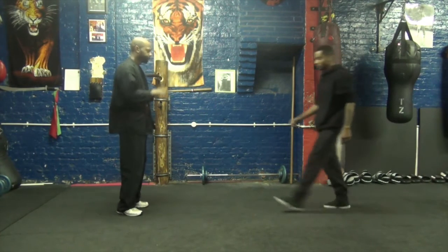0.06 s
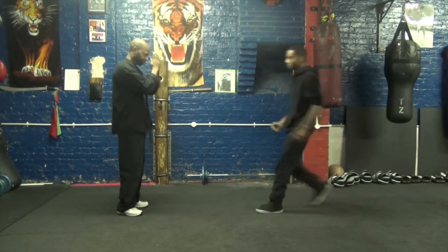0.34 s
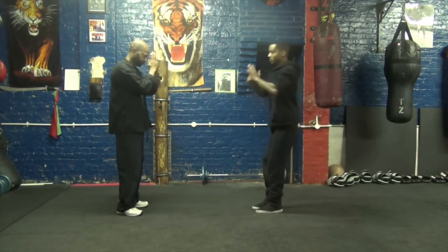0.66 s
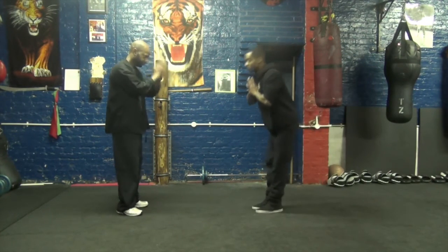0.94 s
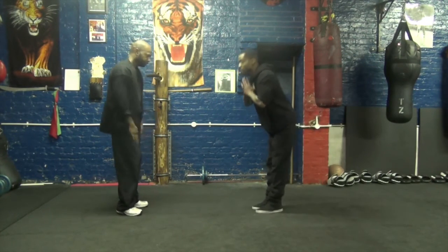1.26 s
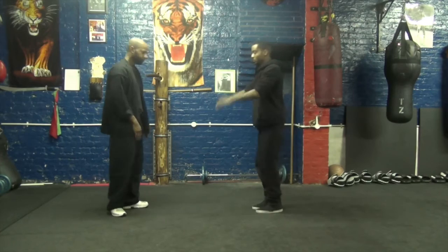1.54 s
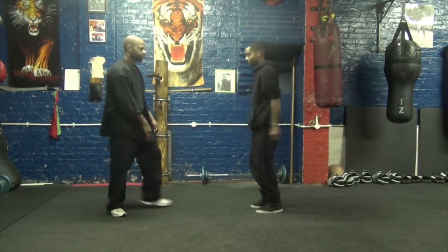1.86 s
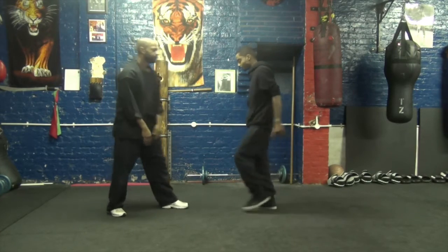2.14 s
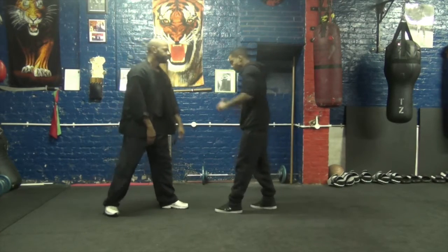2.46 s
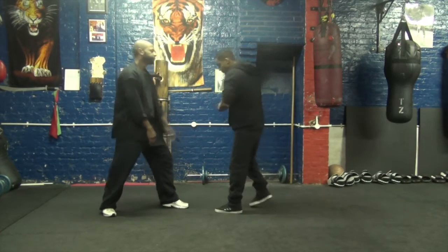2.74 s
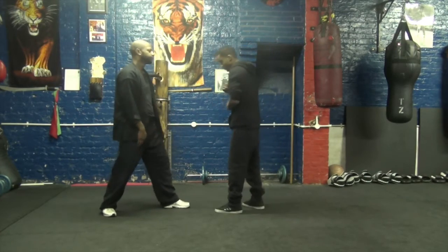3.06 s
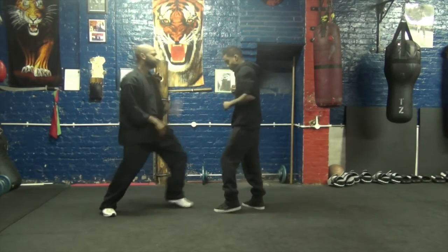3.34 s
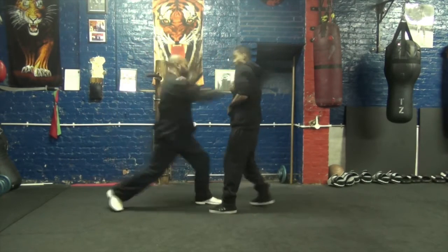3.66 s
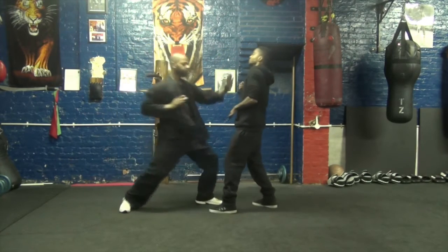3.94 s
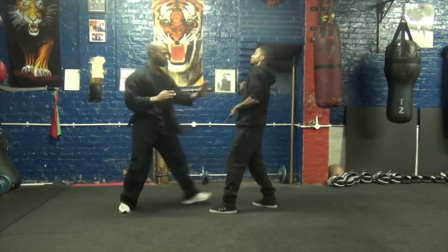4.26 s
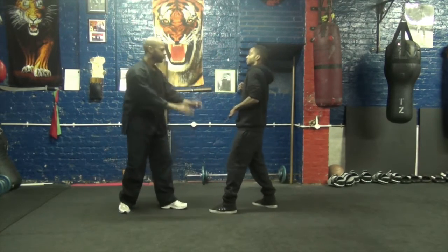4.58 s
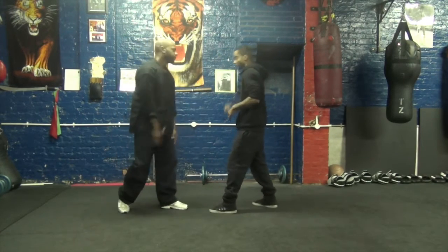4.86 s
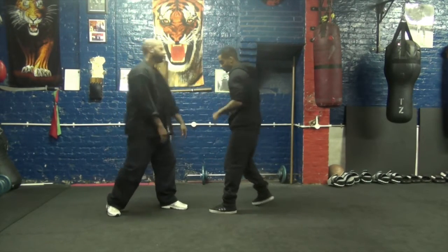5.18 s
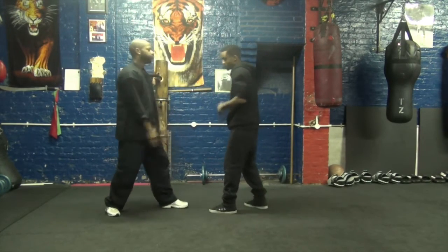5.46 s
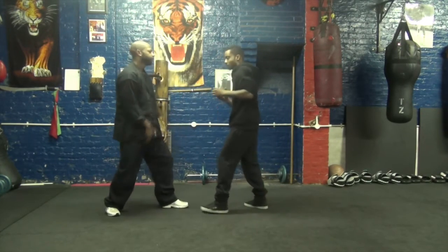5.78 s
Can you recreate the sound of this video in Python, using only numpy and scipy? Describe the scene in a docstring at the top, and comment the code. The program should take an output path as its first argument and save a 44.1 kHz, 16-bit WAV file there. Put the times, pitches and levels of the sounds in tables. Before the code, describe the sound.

A faint engine and traffic hum outside a hard-walled gym while soft steps and rustling sleeves move over a rubber mat. A hand smacks once, the engine fades, and the shuffling continues. Then a quick rush of footfalls, cloth and a dragged shoe brings one hard slap and thump against a body. A few light pats and more steps end it. The sound is almost mono, with a short echo after each blow.

```python
"""Cloth swishes and a shoe scuffs a rubber mat: two people drill hand strikes in a brick-walled gym.
Feet land heel then ball in cushioned thuds, dragged soles rasp, and sleeves rustle with each swing.
Hands slap cloth and body with a crack, a clap of trapped air and a thump, hardest just before 4 s.
The hard room rings after each blow; an engine and traffic hum faintly beyond the walls."""
import sys
import numpy as np
from scipy import signal
from scipy.fft import rfft, irfft
from scipy.io import wavfile
from scipy.ndimage import uniform_filter1d

SR = 44100
rng = np.random.default_rng(int(sys.argv[2]) if len(sys.argv) > 2 else 0)


def materialize(psi):
    """Save the field psi as 16-bit PCM at rate SR to the path in sys.argv[1].

    A 1-D psi becomes a single channel; in a 2-D psi each row is a channel.
    """
    bounded = np.clip(np.atleast_2d(psi).T, -1, 1)
    quanta = np.round(bounded * 32767).astype(np.int16)
    wavfile.write(sys.argv[1], SR, quanta)


N = 265482
TIME = np.arange(N) / SR


def undb(db):
    """Decibels to gain."""
    return 10 ** (np.asarray(db) / 20)


def unit(x):
    """Scale to an energy of one."""
    return x / np.sqrt(np.sum(x ** 2) + 1e-18)


def band(x, hz, kind, order=2):
    """Butterworth filter."""
    return signal.sosfilt(signal.butter(order, np.clip(hz, 10, .45 * SR), kind, fs=SR, output="sos"), x)


def lookup(table, hz):
    """Read (freq_hz, value) points on a log-frequency axis."""
    freq_hz, value = np.transpose(table)
    return np.interp(np.log(hz + 1e-3), np.log(freq_hz), value)


def equalise(x, curve, size=8192):
    """Minimum-phase EQ through (freq_hz, gain_db) points."""
    cepstrum = irfft(np.log(undb(lookup(curve, np.fft.rfftfreq(size, 1 / SR)))))
    cepstrum[1:size // 2] *= 2
    cepstrum[size // 2 + 1:] = 0
    return signal.fftconvolve(x, irfft(np.exp(rfft(cepstrum))))[:len(x)]


def add(track, start_s, x):
    """Mix x into the track from start_s."""
    i = max(int(start_s * SR), 0)
    track[i:i + len(x)] += x[:max(len(track) - i, 0)]


def wander(rate_hz):
    """Random drift that glides to a new value rate_hz times a second."""
    knots = rng.standard_normal(4096)
    return np.interp(TIME * rate_hz, np.arange(len(knots)), knots)


def contact(decay_s, rise, size=8192):
    """Soft surfaces meet in many tiny collisions that swell and die; rise is a share of decay_s."""
    age = np.arange(size) / SR / decay_s
    envelope = np.exp(-age) * (1 - np.exp(-age / rise)) + 1e-9
    burst = envelope * rng.standard_normal(size)
    for _ in range(4):
        # soft surfaces favour no pitch: level the spectrum, then restore the envelope
        flat = irfft(np.exp(1j * np.angle(rfft(burst))))
        local_rms = np.sqrt(np.abs(uniform_filter1d(flat ** 2, size=96)) + 1e-18)
        burst = flat * envelope / local_rms
    return burst


def burst(decay_s, rise, hz, kind="band", order=2):
    """One contact, filtered and scaled to an energy of one."""
    return unit(band(contact(decay_s, rise), hz, kind, order))


def hum(curve, harmonics_db, waver, flutter_db):
    """A distant motor: only its lowest harmonics pass the walls, wavering in pitch and level."""
    time_s, *columns = np.transpose(curve)
    pitch_hz, level_db = (np.interp(TIME, time_s, column) for column in columns)
    phase = 2 * np.pi * np.cumsum(pitch_hz * (1 + waver * wander(5.9))) / SR
    return sum(undb(level_db + gain_db + flutter_db * wander(19)) * np.sin(k * phase)
               for k, gain_db in enumerate(harmonics_db, 1))


# Spectrum of the noise bed: freq_hz, relative_db
ROOM_TONE_EQ = [(25, -7.5), (55, -33), (85, -7.5), (170, 1), (300, -2.5), (500, -8.5), (1000, -15),
                (1700, -18), (3000, -25), (4700, -29), (5900, -23.5), (9000, -27.5), (14500, -28.5),
                (16000, -43)]


def room_tone(level_db=-51, swell_db=1.0, side_db=-26):
    """A near-mono bed of room rumble and thin hiss, swelling slightly."""
    mid, side = (np.sqrt(N) * unit(equalise(rng.standard_normal(N), ROOM_TONE_EQ)) for _ in range(2))
    return undb(level_db + swell_db * wander(3.09)) * (mid + undb(side_db) * np.array([side, -side]))


# Path of the traffic drone: time_s, pitch_hz, level_db
TRAFFIC_CURVE = [(0, 56.4, -56.5), (1.6, 54.9, -53), (3.2, 56, -63), (6, 56.2, -66)]


def traffic():
    """Traffic comes through the walls as one low, unsteady tone."""
    return hum(TRAFFIC_CURVE, [0], waver=0.043, flutter_db=-1.5)


# Path of the engine outside: time_s, firing_rate_hz, level_db
ENGINE_CURVE = [(0, 70.8, -52), (.5, 72.35, -57.5), (.7, 75.35, -47.5), (1.13, 76.8, -45), (1.4, 74, -70)]
# Harmonics 1 to 5 of the firing rate: gain_db
ENGINE_HARMONICS = [-12, -2, -9, -10, -30]


def engine():
    """An engine outside hums at its firing rate, revs a little and falls away."""
    return hum(ENGINE_CURVE, ENGINE_HARMONICS, waver=0.0056, flutter_db=1.0)


# Ring of the brick room: freq_hz, t60_s
GYM_DECAY = [(100, 0.34), (250, 0.8), (600, 0.62), (1500, 0.84), (4000, 0.74), (8000, 0.59), (15000, 0.69)]


def gym_tail(build_s=0.0046, size=49152, bands=12):
    """Dense echoes build up, then fade at each band's own rate."""
    t, hz = np.arange(size) / SR, np.fft.rfftfreq(size, 1 / SR)
    spectrum, tail = rfft(rng.standard_normal(size)), np.zeros(size)
    centres_hz = np.geomspace(100, 15000, bands)
    for centre_hz, weights in zip(centres_hz, np.eye(bands)):
        echoes = irfft(spectrum * lookup(np.c_[centres_hz, weights], hz))
        tail += echoes * np.exp(-np.log(1000) * t / lookup(GYM_DECAY, centre_hz))
    return tail * (1 - np.exp(-t / build_s))


# Tone colour of everything played on the mat: freq_hz, gain_db
GYM_EQ = [(30, -17), (58, -15), (80, -21), (115, -8), (160, -1), (300, -2), (600, -2), (1050, -2),
          (1750, -1), (2200, -4), (3600, -3.5), (4900, -7), (5900, 2), (8000, -5), (11000, -8),
          (16000, -15)]


def gym(x, direct_db, early_db, left_db, early_s=0.012, warmth_db=1.5, warmth_hz=2500, side_db=-47):
    """Direct sound, scattered first echoes and tail, in a narrow stereo image."""
    response = gym_tail()
    response *= 1 + undb(early_db) * np.exp(-np.arange(len(response)) / SR / early_s)
    click = signal.unit_impulse(256)
    direct = click + (undb(warmth_db) - 1) * band(click, warmth_hz, "low", order=1)  # low shelf
    add(response, 0, undb(direct_db) * direct)
    coloured = equalise(x, GYM_EQ)
    mid = signal.fftconvolve(coloured, response)[:N]
    side = signal.fftconvolve(coloured, undb(side_db) * gym_tail())[:N]
    return np.array([mid * undb(left_db / 2) + side, mid * undb(-left_db / 2) - side])


# Swings of sleeves and trouser legs: peak_s, rustle_db, hiss_db, length_s
CLOTH_SWINGS = [ (0.01, -52.5, -54.5, .08), (0.314, -44, -46.5, 0.21), (1.323, -37, -50, 0.016),
                (1.533, -59, -39.5, .02), (1.697, -52.5, -51, 0.039), (1.832, -56, -42.5, 0.068),
                (2.047, -51.5, -53, 0.12), (2.881, -53, -46, .12), (3.436, -65, -42.5, 0.062),
                (3.523, -52.5, -44.5, 0.11), (3.675, -37.5, -28, .066), (3.73, -42, -23.5, 0.067),
                (4.3, -57, -44.5, 0.15), (4.864, -57, -59, .05), (4.934, -47.5, -55, 0.022),
                (5.436, -56, -48.5, 0.027), (6, -52.5, -48.5, 0.12)]


def cloth_swishes(rustle_hz=(500, 2200), hiss_hz=4200, catch_db=3.0, catch_rate_hz=260):
    """Cloth slides in tiny catches, swelling and fading with the speed of the limb."""
    rustle = band(rng.standard_normal(N), rustle_hz, "band", order=1)
    hiss = band(rng.standard_normal(N), hiss_hz, "high", order=1)
    catches = undb(catch_db * wander(catch_rate_hz))
    out = np.zeros(N)
    for peak_s, rustle_db, hiss_db, length_s in CLOTH_SWINGS:
        from_peak = np.abs(TIME - peak_s) / (length_s / 2)
        speed = catches * np.exp(-np.minimum(from_peak, 20))
        out += undb(rustle_db) * unit(speed * rustle) + undb(hiss_db) * unit(speed * hiss)
    return out


# Rubber soles dragged over the mat: start_s, level_db, pitch_hz, width_hz, decay_s
SOLE_DRAGS = [(0.271, -38, 525, 410, 0.037), (2.589, -56, 880, 293, 0.011), (3.018, -51, 810, 298, 0.007),
              (3.704, -28.5, 950, 260, 0.022), (4.985, -39.5, 492, 153, 0.028),
              (5.177, -53.5, 850, 400, 0.017)]


def sole_drags(rise=0.14):
    """A sliding sole sticks and slips unevenly, giving a short, half-pitched rasp."""
    out = np.zeros(N)
    for start_s, level_db, pitch_hz, width_hz, decay_s in SOLE_DRAGS:
        edges_hz = pitch_hz * np.exp(np.array([-.5, .5]) * width_hz / pitch_hz)
        add(out, start_s, undb(level_db) * burst(decay_s, rise, edges_hz))
    return out


# Feet rolling from heel to ball: start_s, heel_db, ball_db, roll_s, thud_cutoff_hz, scuff_db
FOOTFALLS = [ (0.247, -42, -44, 0.023, 730, -63), (0.689, -47.5, -46.5, .018, 486, -53),
             (1.897, -46.5, -52, .018, 630, -41.5), (2.092, -43, -51, .058, 640, -46),
             (2.190, -48.5, -51.5, 0.047, 566, -55), (2.415, -45.5, -47.5, 0.046, 506, -38.5),
             (2.590, -42, -63, .03, 800, -55.5), (2.903, -37, -42, 0.057, 390, -52),
             (3.016, -46.5, -54, 0.044, 620, -53.5), (3.558, -42.5, -47, 0.0086, 640, -66),
             (3.582, -32, -23.5, 0.032, 700, -38), (3.686, -30, -41, .02, 580, -29),
             (3.821, -27.5, -35, .012, 258, -33), (4.492, -55.5, -48.5, .06, 493, -68),
             (4.639, -47, -59, 0.055, 450, -51), (5.186, -45.5, -49, .02, 600, -59),
             (5.447, -35, -30.5, 0.035, 820, -51), (5.636, -34.5, -40.5, 0.011, 550, -65),
             (5.902, -40.5, -44, .010, 630, -54)]


def footsteps(tap_hz=(720, 1150), floor_hz=(145, 235), grit_hz=1700, scuff_hz=5200,
              heel_decay_s=0.0102, heel_rise=0.03, ball_decay_s=0.0148, ball_rise=0.078):
    """The mat cushions heel and ball to a thud with a hollow tap; the floor booms, the sole scuffs."""
    out = np.zeros(N)
    for start_s, heel_db, ball_db, roll_s, thud_cutoff_hz, scuff_db in FOOTFALLS:
        heel = (start_s, heel_db, scuff_db, heel_decay_s, heel_rise)
        ball = (start_s + roll_s, ball_db, scuff_db - 7, ball_decay_s, ball_rise)  # scuffs less
        for land_s, weight_db, sole_db, decay_s, rise in (heel, ball):
            cushioned = band(contact(decay_s, rise), thud_cutoff_hz, "low", order=5)
            thud = unit(band(cushioned, hz=75, kind="high", order=1))
            tap = undb(-13) * burst(decay_s, rise, tap_hz)
            boom = undb(-7) * burst(decay_s, rise, floor_hz)
            grit = undb(-22) * burst(decay_s, rise, grit_hz, "low")
            scuff = burst(decay_s, rise, scuff_hz, "high", order=1)
            add(out, land_s, undb(weight_db) * (thud + tap + boom + grit) + undb(sole_db) * scuff)
    return out


# Hands on cloth and body: start_s, crack_db, smack_db, clap_db, clap_pitch_hz, thump_db, contact_s
HAND_STRIKES = [ (1.326, -28, -22.5, -27.5, 1980, -17.5, 0.0032),
                (2.886, -55, -50.5, -47, 2090, -38, 0.0073), (3.753, -15.5, -24, -16, 1500, -16.5, .006),
                (4.933, -46, -43, -46.5, 1920, -36.5, 0.0044), (4.975, -44, -43, -39, 1980, -37, 0.0061),
                (5.565, -42.5, -51, -40, 1950, -33, 0.016)]


def hand_slaps(crack_hz=(2400, 9000), smack_hz=(170, 1300), thump_cutoff_hz=580, rise=0.19,
               clap_decay_s=0.00659, clap_spread=1.556, clap_lag_s=0.0078, thump_lag_s=0.015):
    """Skin cracks and smacks, the closing palm claps out trapped air, then the body gives and thumps."""
    out = np.zeros(N)
    for start_s, crack_db, smack_db, clap_db, clap_pitch_hz, thump_db, contact_s in HAND_STRIKES:
        crack = burst(contact_s, rise, crack_hz, order=1)
        smack = burst(2 * contact_s, rise, smack_hz, order=3)
        clap_edges_hz = (clap_pitch_hz / clap_spread, clap_pitch_hz * clap_spread)
        clap = burst(clap_decay_s, rise, clap_edges_hz, order=3)
        push = contact(0.013 + 2.06 * contact_s, rise)  # a longer contact pushes the body for longer
        muffled = band(push, thump_cutoff_hz, "low", order=4)
        thump = unit(band(muffled, hz=130, kind="high", order=1))
        add(out, start_s, undb(crack_db) * crack + undb(smack_db) * smack)
        add(out, start_s + clap_lag_s, undb(clap_db) * clap)
        add(out, start_s + thump_lag_s, undb(thump_db) * thump)
    return out


def scene():
    """Feet, hands and cloth each get their own gain and echoes in the gym, over the quiet background."""
    feet = gym(footsteps() + sole_drags(), direct_db=28.5, early_db=6, left_db=1.33)
    hands = gym(hand_slaps(), direct_db=30, early_db=-9.5, left_db=0.94)
    cloth = gym(cloth_swishes(), direct_db=34, early_db=-11.0, left_db=0.73)
    return engine() + traffic() + room_tone() + cloth + feet + hands


def record(dry):
    """Soft clipping rounds the highest peaks; a steep low-pass cuts the top."""
    top_cut = signal.ellip(10, .2, 80, 15800, fs=SR, output="sos")
    return signal.sosfilt(top_cut, np.tanh(dry))


dry = scene()
out = record(dry)
materialize(out)
```